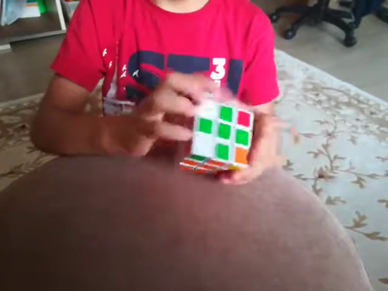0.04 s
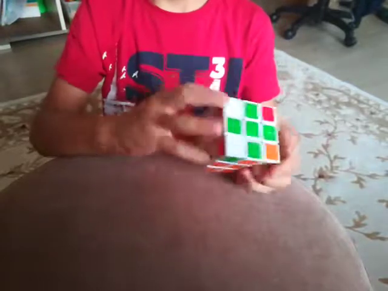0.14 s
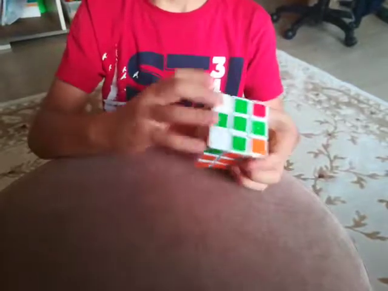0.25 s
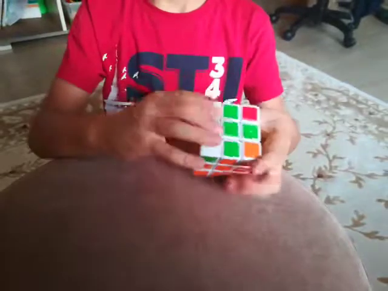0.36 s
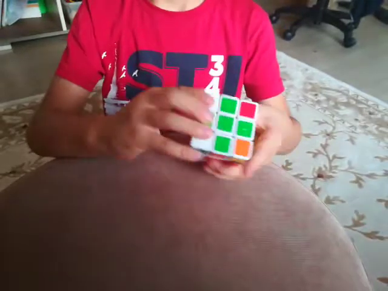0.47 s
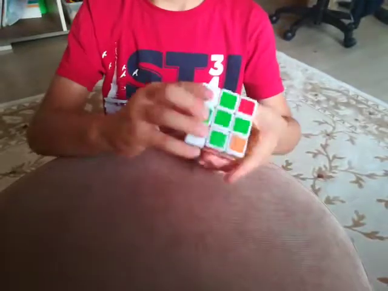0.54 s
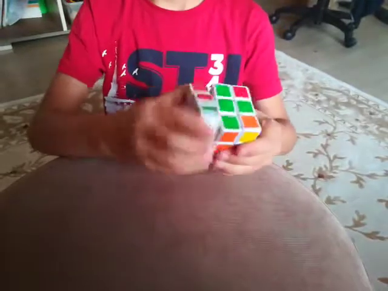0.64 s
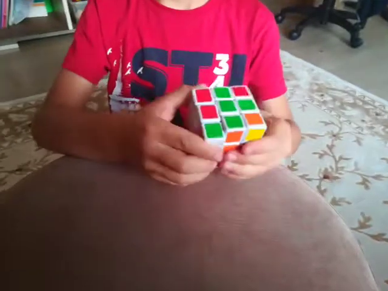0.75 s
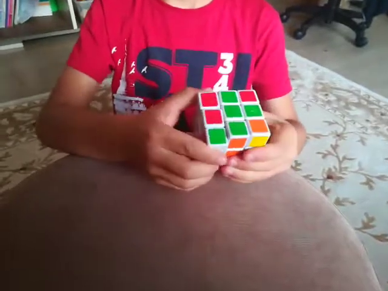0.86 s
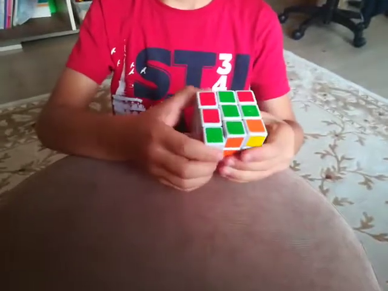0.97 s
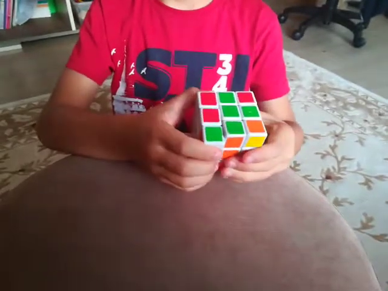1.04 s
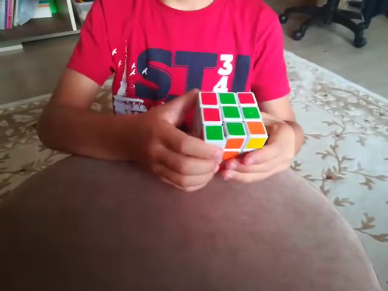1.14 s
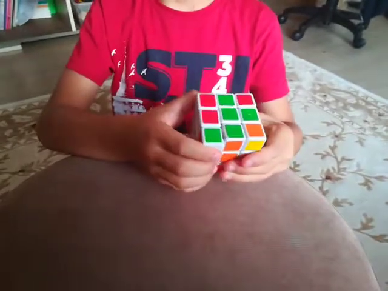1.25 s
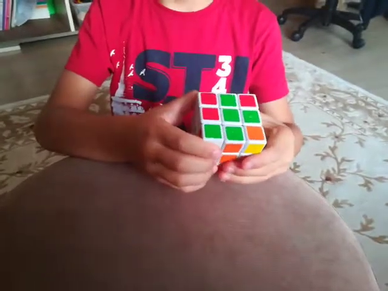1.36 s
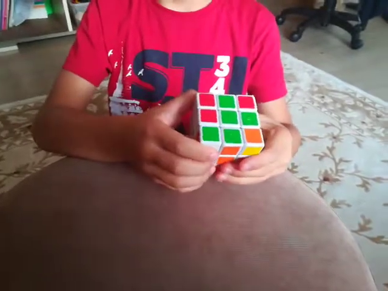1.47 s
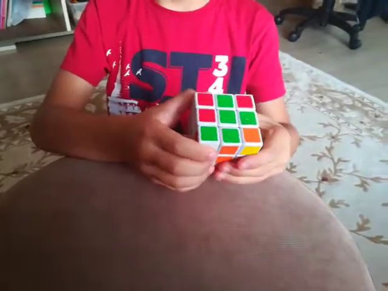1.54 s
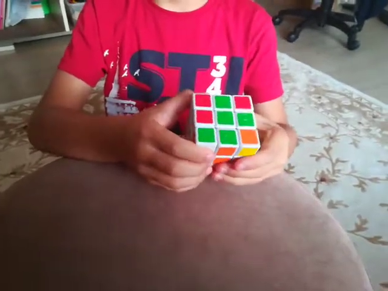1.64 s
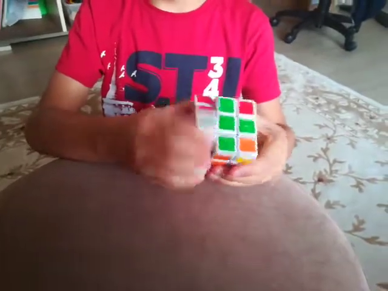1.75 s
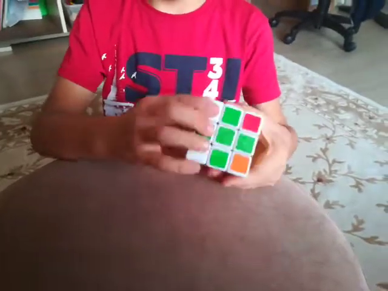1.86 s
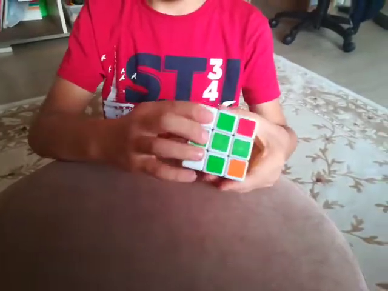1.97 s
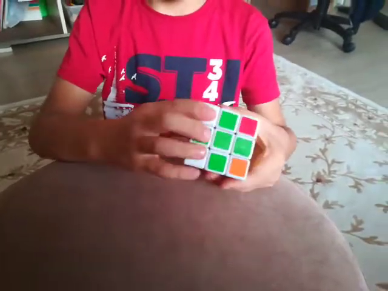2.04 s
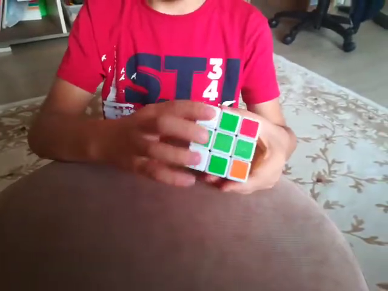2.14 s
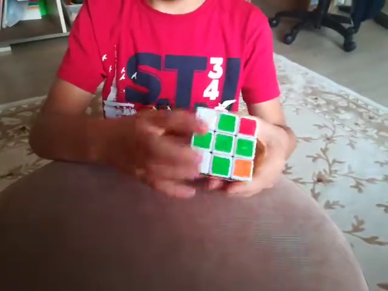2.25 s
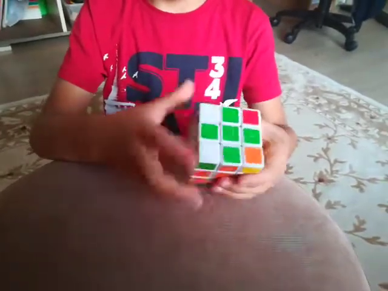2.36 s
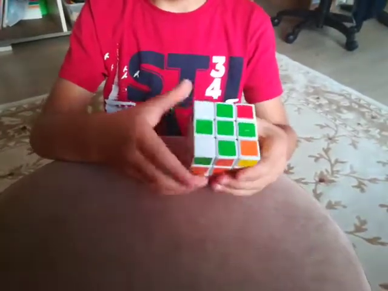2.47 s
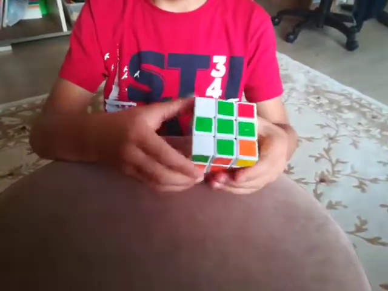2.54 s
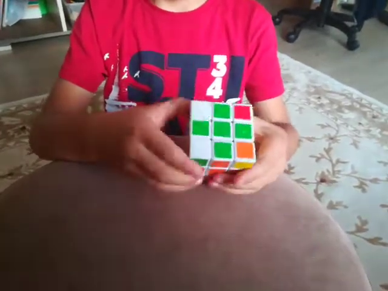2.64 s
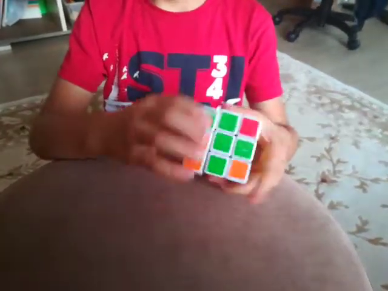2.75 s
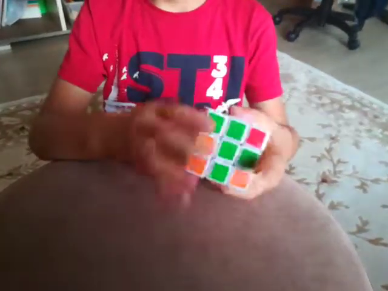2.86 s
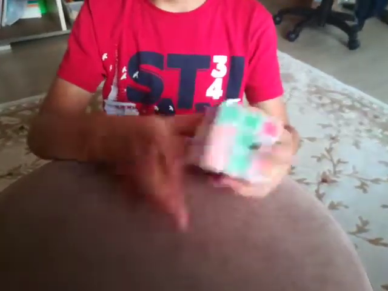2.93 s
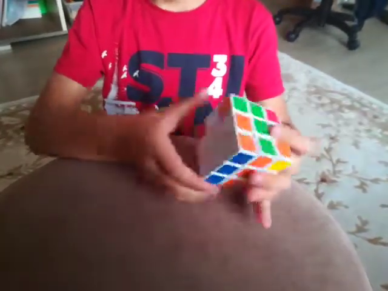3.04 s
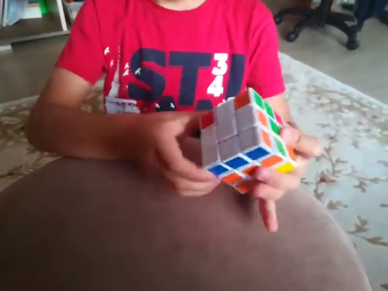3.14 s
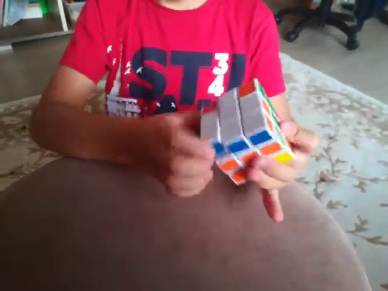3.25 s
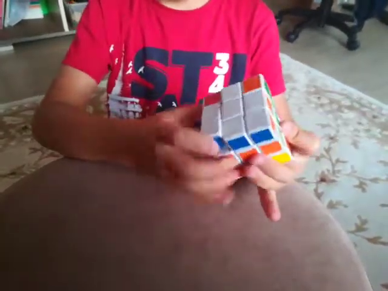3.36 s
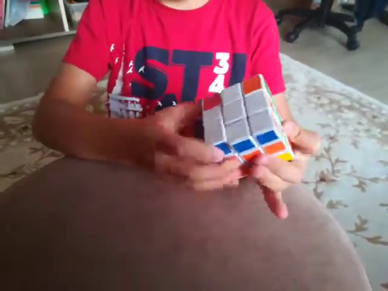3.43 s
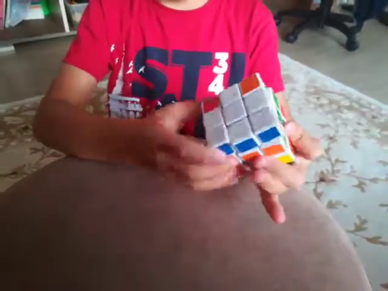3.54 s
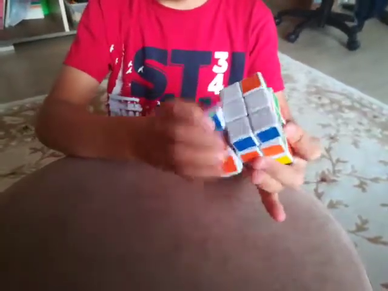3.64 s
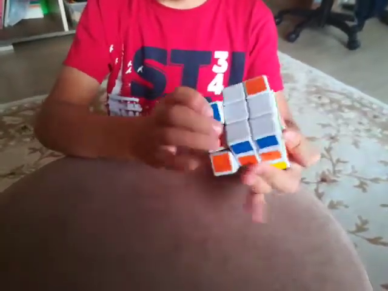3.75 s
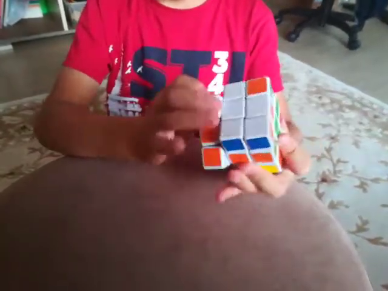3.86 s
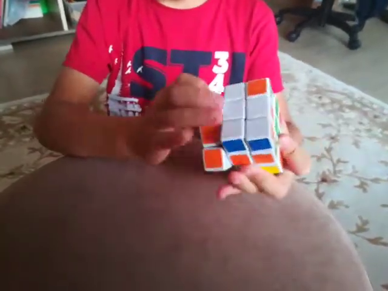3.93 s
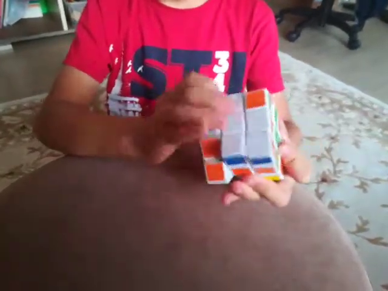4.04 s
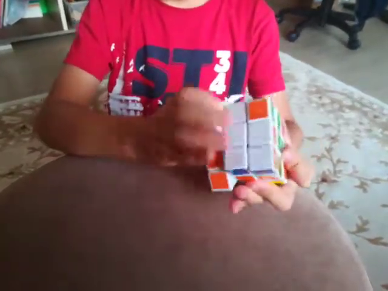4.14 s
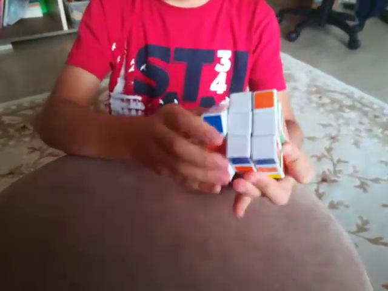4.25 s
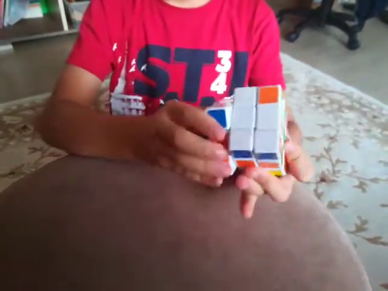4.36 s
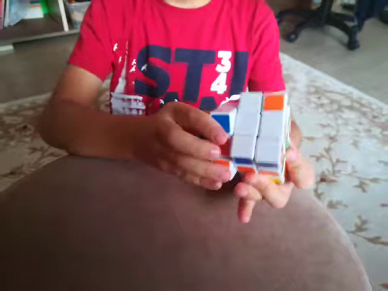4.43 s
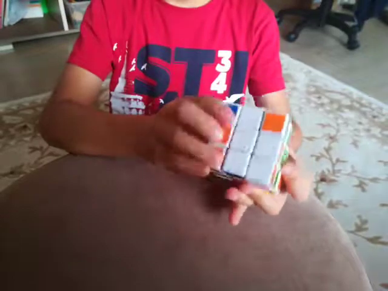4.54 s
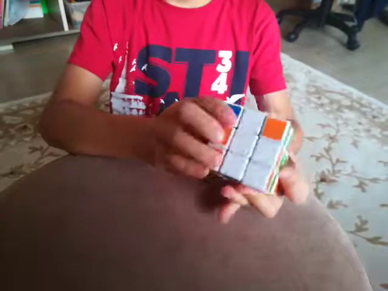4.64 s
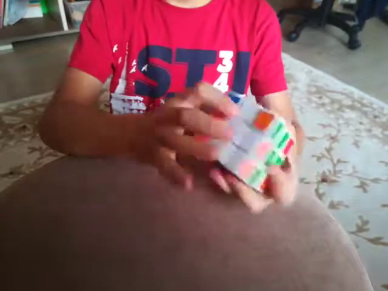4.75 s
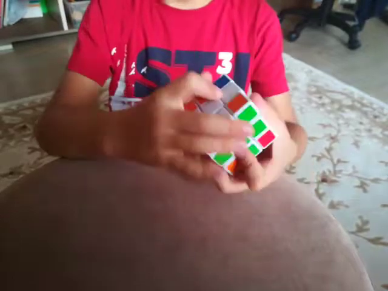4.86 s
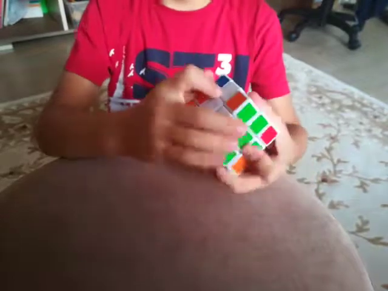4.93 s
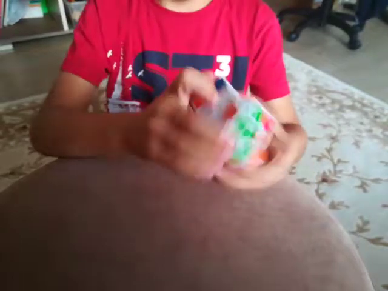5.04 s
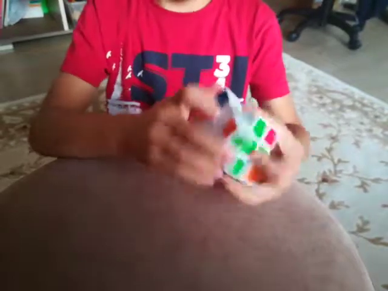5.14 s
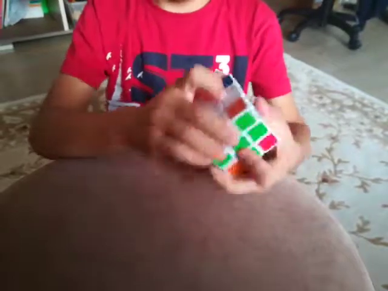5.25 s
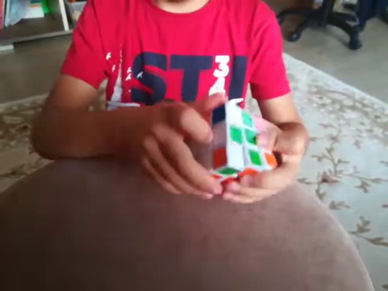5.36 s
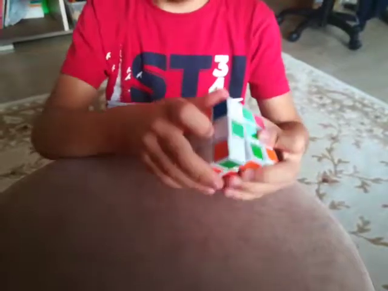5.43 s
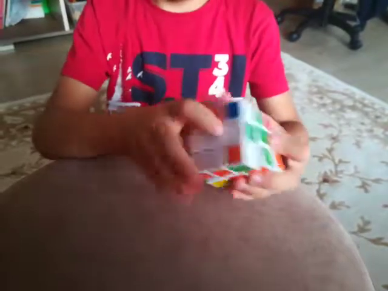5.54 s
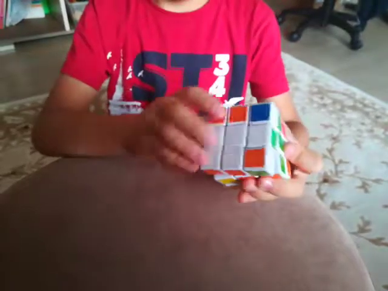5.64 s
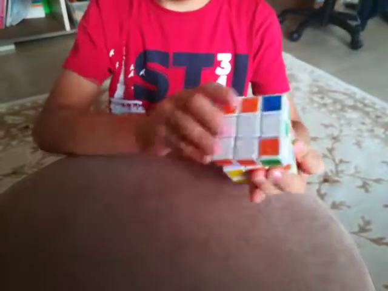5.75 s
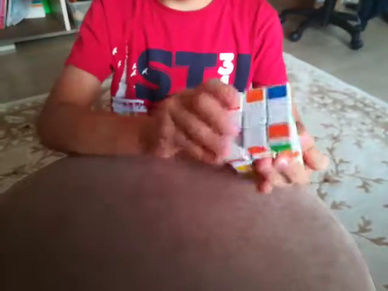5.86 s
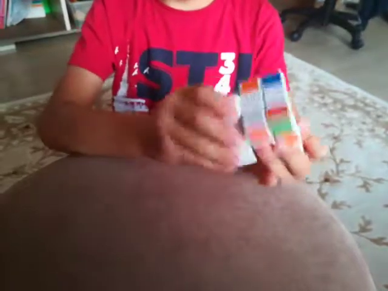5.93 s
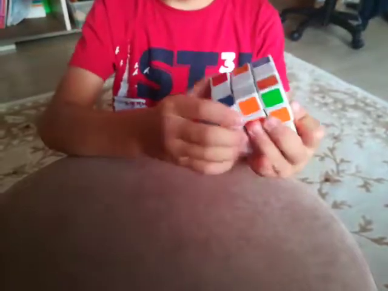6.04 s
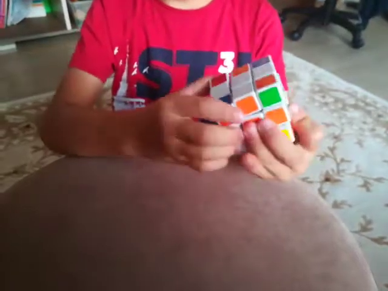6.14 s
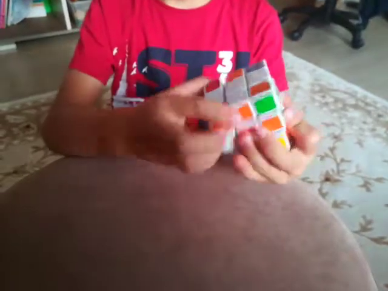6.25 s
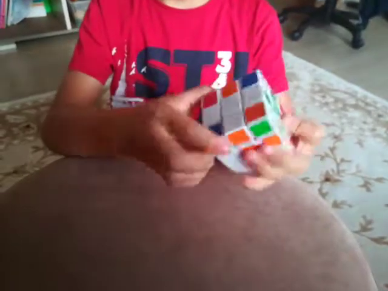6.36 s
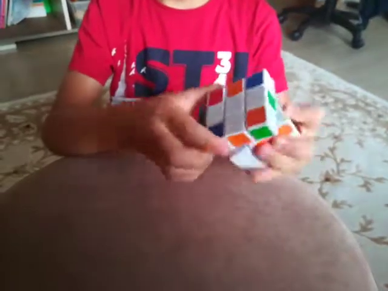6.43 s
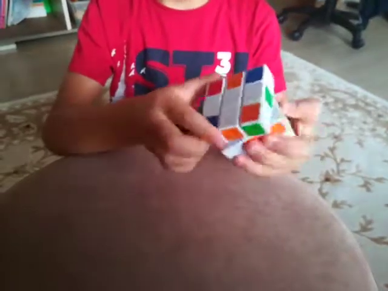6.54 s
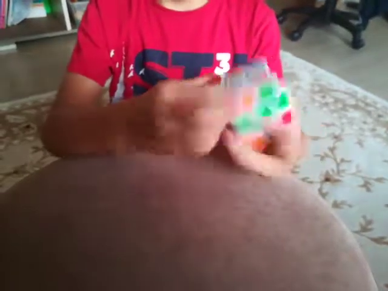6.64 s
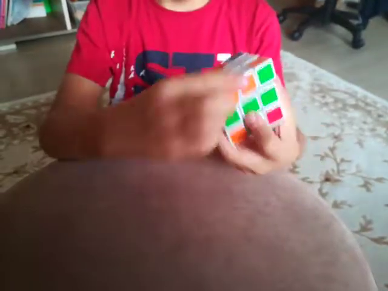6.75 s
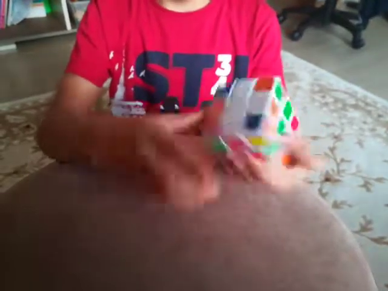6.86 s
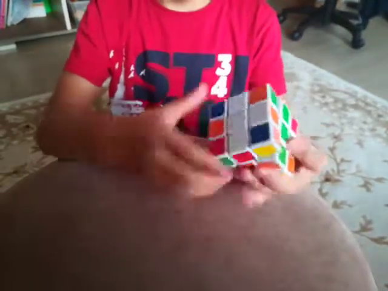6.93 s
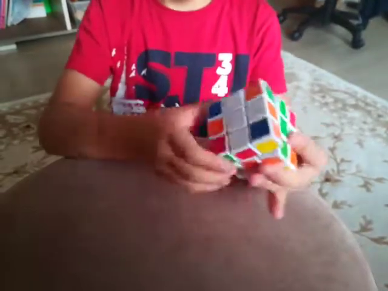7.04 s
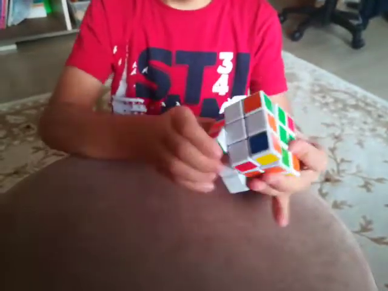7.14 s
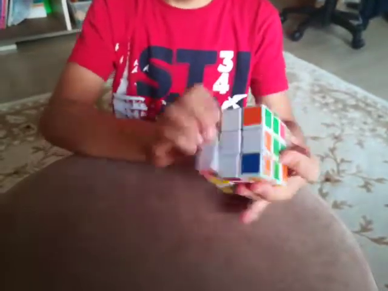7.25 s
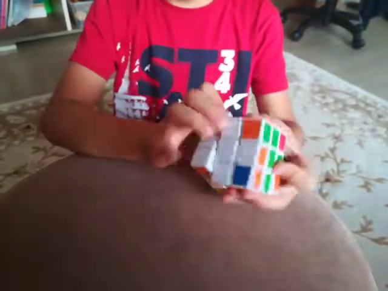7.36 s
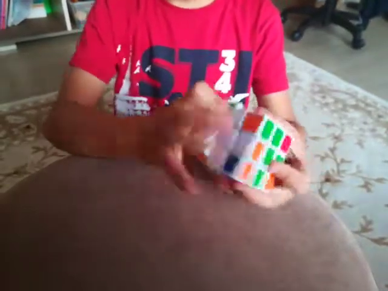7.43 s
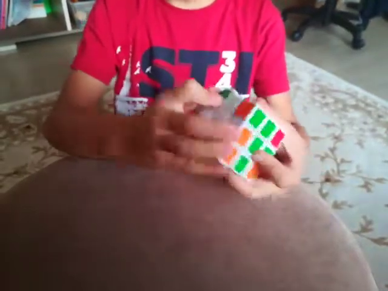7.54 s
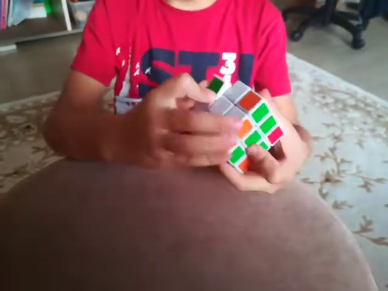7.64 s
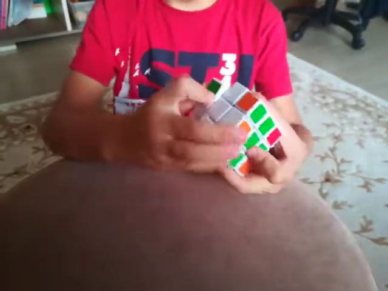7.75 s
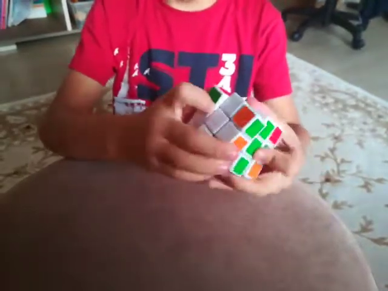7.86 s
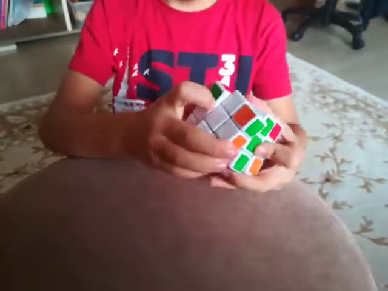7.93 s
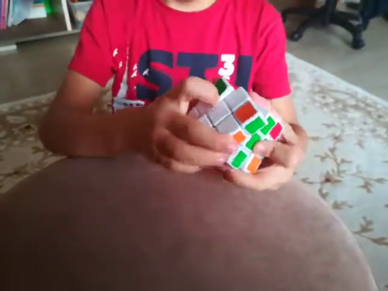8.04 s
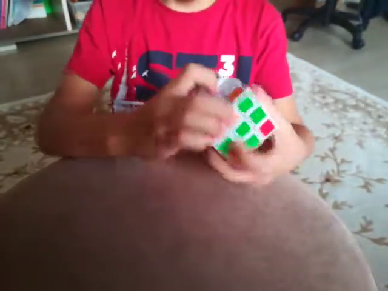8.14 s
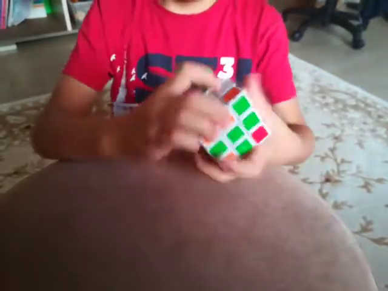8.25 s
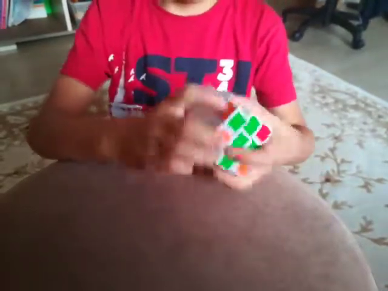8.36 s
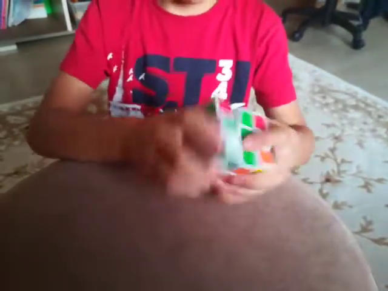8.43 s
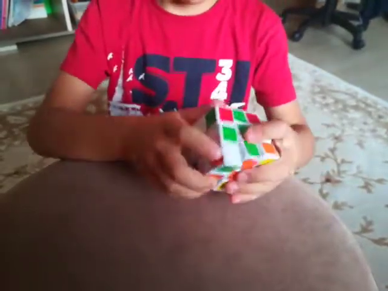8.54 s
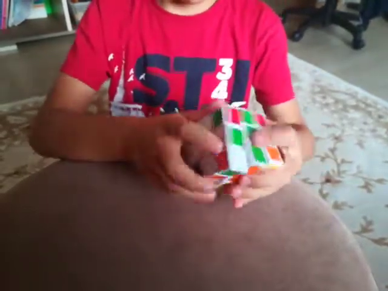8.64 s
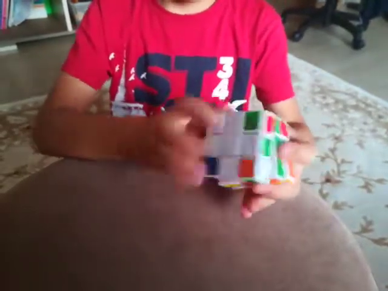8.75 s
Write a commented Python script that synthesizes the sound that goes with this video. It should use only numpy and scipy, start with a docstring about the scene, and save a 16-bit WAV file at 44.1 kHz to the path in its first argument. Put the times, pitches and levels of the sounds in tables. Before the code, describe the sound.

A plastic puzzle cube is turned by hand up close, a few separate crunchy clicks giving way to near-continuous rattling and rasping turns.

```python
"""A plastic puzzle cube is turned quickly by hand close to a phone in a quiet living room.
Its hollow pieces tick (noise bursts rung through a plastic shell and an air space), a sliding layer
rasps (dense random ticks), and now and then a layer slams into line (a few ms of noise).
Fingers bump, squeak and slide (filtered noise), a spring rings once (fading sine tones),
and the room adds a short echo tail and a low murmur (shaped noise)."""
import sys
import numpy as np
from scipy import signal
from scipy.fft import rfft, irfft
from scipy.io import wavfile
from scipy.ndimage import uniform_filter1d

SR = 44100
rng = np.random.default_rng(int(sys.argv[2]) if len(sys.argv) > 2 else 0)


def materialize(psi):
    """Save the field psi as 16-bit PCM at rate SR to the path in sys.argv[1].

    A 1-D psi becomes a single channel; in a 2-D psi each row is a channel.
    """
    bounded = np.clip(np.atleast_2d(psi).T, -1, 1)
    quanta = np.round(bounded * 32767).astype(np.int16)
    wavfile.write(sys.argv[1], SR, quanta)


N = 387638  # length in samples, about 8.79 s


def undb(db):
    """Turn decibels into a plain gain."""
    return 10 ** (np.asarray(db) / 20)


def curve(rows):
    """Join rows (t/s, value) with straight lines, giving one value per sample."""
    return np.interp(np.arange(N) / SR, *np.transpose(rows))


def random_curve(step_s):
    """Wander between random values, with a new one every step."""
    steps = np.arange(0, N / SR, step_s)
    return curve(np.c_[steps, rng.standard_normal(len(steps))])


def shape(points, hz):
    """Read a spectrum of rows (f/Hz, level/dB) at the given frequencies."""
    f, db = np.transpose(points)
    return np.interp(np.log(np.maximum(hz, 1)), np.log(f), db)


def ring(db):
    """Make the sound of one tap on a body with this spectrum, with nothing before the tap."""
    cepstrum = irfft(db * np.log(10) / 20)
    half = cepstrum.shape[-1] // 2
    # folding the second half onto the first puts the energy as early as possible
    cepstrum[..., 1:half] *= 2
    cepstrum[..., half + 1:] = 0
    return irfft(np.exp(rfft(cepstrum)))


def colour(x, points, size=1024):
    """Pass a sound through a response of rows (f/Hz, level/dB)."""
    response = ring(shape(points, np.fft.rfftfreq(size, 1 / SR)))
    return signal.fftconvolve(x, response)[:len(x)]


def unit(x):
    """Scale to an energy of one along the last axis."""
    return x / np.sqrt(np.sum(x ** 2, axis=-1, keepdims=True) + 1e-18)


def add(track, s, sound):
    """Mix a sound into a track at a time in seconds."""
    i = max(int(s * SR), 0)
    part = sound[..., :max(N - i, 0)]
    track[..., i:i + part.shape[-1]] += part


def uneven(count, db, size, order):
    """Smooth random hills in a spectrum: no two pieces ring alike, nor alike in two directions."""
    hills = rng.standard_normal((count, size // 2 + 1))
    hills = uniform_filter1d(uniform_filter1d(hills, order), order)
    return db * np.tanh(hills / hills.std())


def sound_of(force, spectrum_db):
    """Ring the force of each contact, one per row, through its body."""
    return irfft(rfft(force) * rfft(ring(spectrum_db)))


# spectrum of the still room's murmur: f/Hz, relative level/dB
MURMUR_SPECTRUM = [(20, 2.5), (45, 0), (90, -4), (160, -13), (300, -15), (500, -23.5), (1000, -18),
                   (1750, -18.5), (2500, -28), (5000, -30), (13800, -35.5), (15000, -54)]
# how the murmur's overall level changes: t/s, level/dB
MURMUR_LEVEL = [(0, -62), (1.4, -62.5), (2.4, -65), (4.3, -66), (5.4, -69.5), (8.79, -67.5)]


def air(wide_hz=280, hiss_db=-82, swell_db=2):
    """The house murmurs, its bass swelling unevenly and alike on both sides, under steady microphone hiss."""
    f = np.fft.rfftfreq(N, 1 / SR)
    mid, side = rfft(rng.standard_normal((2, N))) * undb(shape(MURMUR_SPECTRUM, f))
    bass = mid * (f < 130)
    swelling_bass = irfft(bass, N) * undb(swell_db * random_curve(.1))
    mid = mid - bass + rfft(swelling_bass)
    side = side * f / np.hypot(f, wide_hz)  # little left-right difference in the bass
    murmur = irfft(np.array([mid + side, mid - side]), N)
    murmur = murmur / murmur.std() * undb(curve(MURMUR_LEVEL))
    hiss = undb(hiss_db) * rng.standard_normal((2, N))
    return murmur + hiss


# fingers push a layer round, from a light nudge to a full turn:
# start t/s, length/s, rasp level/dB reached at the end of the push (before rub_db in rasp)
TURNS = [(0, 0.035, -52.5), (0.155, 0.023, -77), (0.254, 0.13, -63), (0.427, 0.067, -43.5),
         (0.502, 0.083, -33.5), (0.585, 0.092, -47.5), (0.874, .17, -56), (1.193, 0.06, -59.5),
         (1.633, 0.083, -35), (1.735, 0.031, -43), (2.111, 0.077, -57), (2.581, 0.09, -30.5),
         (2.835, 0.042, -45), (3.056, 0.043, -38), (3.277, 0.046, -46), (3.37, 0.053, -49.5),
         (3.513, 0.097, -31), (3.621, 0.072, -45), (3.757, 0.069, -42), (3.971, 0.12, -50),
         (4.381, 0.089, -37.5), (4.571, 0.093, -62.5), (4.759, 0.098, -48), (4.879, .035, -31),
         (4.951, 0.035, -32), (5.039, 0.047, -37.5), (5.183, 0.1, -41), (5.667, 0.11, -59.5),
         (5.765, 0.15, -36), (5.959, .11, -50.5), (6.172, 0.15, -42), (6.459, 0.039, -46.5),
         (6.5, 0.081, -29.5), (6.668, 0.049, -55.5), (6.92, 0.081, -49.5), (7.012, 0.062, -36),
         (7.106, .075, -33), (7.285, 0.022, -56), (7.366, 0.098, -53.5), (7.46, 0.073, -46),
         (7.619, 0.073, -51.5), (7.694, 0.043, -41), (7.768, 0.13, -39.5), (7.943, 0.12, -39),
         (8.16, 0.1, -45), (8.302, 0.076, -32.5), (8.437, 0.093, -55.5), (8.696, 0.058, -71)]


def push(attack_s=.004, swell_db=6.5, release_s=.008, creep_db=-10, creep_s=.049):
    """Each push takes hold, bears down harder, lets go, and the loosened layer creeps faintly on."""
    age, out = np.arange(SR) / SR, np.zeros(N)
    for s, length, db in TURNS:
        swell = undb(db + swell_db * (np.minimum(age / length, 1) - 1.0))
        attack = np.minimum(age / attack_s, 1)
        after = np.maximum(age - length, 0)
        creep = undb(creep_db) * np.exp(-after / creep_s)
        release = np.maximum(np.exp(-after / release_s), creep)
        add(out, s, swell * attack * release)
    return out


# ring of a small plastic piece: f/Hz, relative level/dB
SHELL = [(100, -36), (500, -45.5), (1000, -44.5), (1700, -25), (2500, -14), (3200, -5), (4500, -2.5),
         (5200, -2.5), (6900, 4), (8200, -2), (9300, -13), (11000, -34.5), (13200, -29), (15000, -37.5)]
# ring of the cube's air space and core: f/Hz, relative level/dB
HOLLOW = [(200, -15), (500, -16), (900, 0.5), (1500, 17.5), (2200, 21), (3000, 9.5), (6000, -31)]


def rasp(rate=1900, spread_db=4.0, catch_db=6, rub_db=-2.07, knock_db=-14, count=8, size=512):
    """Sliding faces stick and slip: dense uneven ticks, from one piece after another as each catches."""
    catch_s, even_s = .006, .04
    catching = np.array([random_curve(catch_s) for _ in range(count)])
    strength = undb(spread_db * np.minimum(rng.exponential(size=(count, N)), 3))
    happens = rng.random((count, N)) < rate / count / SR  # rate: slips per second, all pieces together
    slips = happens * strength * rng.choice([-1, 1], (count, N))
    rubbing = 0.044 * rng.standard_normal((count, N))
    slips = (slips + rubbing) * undb(catch_db * catching)
    # the fingers' push sets the power, however it is split into slips
    power = uniform_filter1d(np.sum(slips ** 2, axis=0), int(even_s * SR))
    slips *= push() * undb(rub_db) / np.sqrt(power)
    f = np.fft.rfftfreq(size, 1 / SR)
    tracks = []
    for body in (SHELL, SHELL, HOLLOW):  # tick left, tick right, knock
        rings = unit(ring(shape(body, f) + uneven(count, 7, size, order=7)))
        tracks.append(signal.oaconvolve(slips, rings, axes=1)[:, :N].sum(axis=0))
    left, right, knock = tracks
    return np.array([left, right, undb(knock_db) * knock])


def room(x, wet_db, t60, gap_s=.004):
    """Direct sound plus a tail that starts with sparse reflections from the table and the player."""
    t = np.arange(int(.6 * SR)) / SR
    density = np.clip(t / .04, .02, 1) ** 2  # echoes crowd together over 40 ms
    echoes = rng.standard_normal(len(t)) * (rng.random(len(t)) < density) / np.sqrt(density)
    fade = np.exp(-np.log(1000) * t / t60)  # down 60 dB after t60 seconds
    tail = unit(echoes * (t > gap_s) * fade)
    return x + undb(wet_db) * signal.fftconvolve(x, tail)[:N]


# the right microphone faces away, so its treble is dull, and its port resonates: f/Hz, level/dB
SHADE = [(1000, -1), (1300, -4), (1550, 7.5), (1800, 15), (2150, 2.5), (2850, -11.5), (3700, -9),
         (5400, -17), (7000, -26), (8200, -27.5), (10000, -15.5), (11500, -3.5), (13500, -9.5)]


def right_microphone(x, lag_s=.00012):
    """Sound reaches this microphone a little later, coloured by its angle and its port."""
    shaded = rfft(colour(x, SHADE))
    return irfft(shaded * np.exp(-2j * np.pi * np.fft.rfftfreq(N, 1 / SR) * lag_s), N)


def rattles(firm_db=-40, rattle_db=-34.5, follow=0.62, scatter_db=2.5, centre_hz=6450, scatter_hz=450,
            hollow_db=-18, hollow_scatter_db=4, count=6):
    """Every turn jostles a few loose pieces along its way, louder under a firmer push; rows as in SNAPS."""
    start, length, db = np.transpose(TURNS)[:, :, None]
    s = start + length * (np.arange(count) + rng.random((len(TURNS), count))) / count
    loud, hard, hollow = rng.standard_normal((3, len(TURNS), count))
    level = rattle_db + follow * (db - firm_db) + scatter_db * loud
    tick_hz = centre_hz + scatter_hz * hard
    knock = hollow_db + hollow_scatter_db * hollow
    return np.column_stack([column.ravel() for column in (s, level, tick_hz, knock)])


# pieces snapping past each other: t/s, level/dB (rms over a click, before piece_db),
# f/Hz steering how bright the tick is, hollow knock's relative level/dB (before knock_db)
SNAPS = [(0.0292, -45, 6120, -35), (0.0897, -42, 7600, -12), (.256, -45.5, 6400, -22),
         (.282, -34.5, 6800, -43), (0.3767, -38, 6600, -25), (0.4424, -34, 6700, -38),
         (.454, -29.5, 6800, -33), (0.4753, -26, 6000, -5.5), (0.4854, -26.5, 5500, -34),
         (0.512, -14.5, 7360, -10.5), (0.5523, -17.5, 7150, -22), (.5668, -21.5, 7060, -27),
         (.624, -20, 7500, -35), (0.6299, -22, 7000, -30), (0.6344, -20.5, 5860, -10.5),
         (0.711, -33.5, 6200, -27), (0.8757, -45, 7200, -20), (0.8834, -35, 7850, -22),
         (0.9276, -36.5, 7300, -20), (.951, -40.5, 6400, -31), (1.0299, -34, 6830, -22),
         (1.224, -41, 6130, -25), (1.269, -28.5, 7350, -21.5), (1.491, -38.5, 6450, -24),
         (1.5205, -32.5, 6100, -18), (1.6061, -29.5, 6400, -22), (1.6322, -22, 6660, -22),
         (1.6538, -21.5, 6200, -9.5), (1.678, -16, 5600, -5), (1.6942, -7.5, 6600, -25),
         (1.708, -27, 6200, -1.5), (1.7435, -24, 6160, -11.5), (1.7904, -30, 6200, -25),
         (2.1185, -25.5, 6500, -21.5), (2.1747, -26.5, 6280, -16), (2.5632, -39.5, 6410, -17),
         (2.589, -27, 6900, -21), (2.6, -19.5, 7200, -7), (2.6412, -15, 5500, -8.5),
         (2.7327, -28.5, 6400, -34), (2.827, -41, 5200, -17), (2.8415, -18.5, 7350, -14.5),
         (2.9653, -31, 6380, -13), (3.0038, -19.5, 6700, -22), (3.0605, -28.5, 7360, -17.5),
         (3.0876, -20.5, 5200, -10), (3.0974, -25, 6400, -13.5), (3.181, -35.5, 4800, -35),
         (3.2196, -29.5, 6000, -20), (3.2609, -22, 6000, -23), (3.282, -25.5, 6450, -27),
         (3.3007, -26, 6400, -35), (3.337, -31, 7140, -32), (3.3618, -32, 6050, -18),
         (3.442, -33, 5370, -17), (3.472, -22.5, 6840, -21.5), (3.51, -26, 6800, -23),
         (3.5644, -21.5, 7040, -29), (3.5795, -15.5, 6760, -26), (3.6012, -14, 6750, -25),
         (3.6378, -16.5, 6450, -15), (3.6783, -13.5, 6240, -37), (3.7543, -23, 6100, -48),
         (3.7776, -22.5, 5960, -35), (3.844, -35.5, 5100, -26), (3.8735, -25, 5400, -20),
         (3.8912, -16, 6750, -20), (3.905, -3, 5850, -17), (3.9162, -23, 6100, -21),
         (3.9772, -15.5, 7750, -29), (4.0186, -29.5, 7350, -20), (4.0379, -29, 6400, -16),
         (4.049, -32, 5870, -17), (4.0634, -28, 6200, -19), (4.1562, -29.5, 7700, -26),
         (4.1714, -21.5, 7300, -26), (4.1878, -26, 6800, -23), (4.2687, -44, 6800, -24),
         (4.3776, -33.5, 6840, -39), (4.3954, -20.5, 6440, -24.5), (4.411, -23, 6000, -12),
         (4.4242, -26.5, 6750, -28), (4.4301, -24, 5960, -7), (4.5718, -35.5, 6200, -25),
         (4.6235, -29, 6450, -16), (4.638, -28.5, 6620, -18), (4.6664, -28.5, 6640, -16.5),
         (4.7757, -27.5, 6850, -24), (4.7857, -30, 7040, -27), (4.823, -22.5, 7100, -24),
         (4.833, -27, 6600, -25), (4.846, -19, 5600, -13), (4.886, -29.5, 6000, -7),
         (4.9443, -33.5, 4700, -27), (4.9576, -7, 6200, -18), (4.9631, -10.5, 5300, -8),
         (4.976, -10, 6450, -13), (5.0542, -33, 6300, -26), (5.0723, -20, 5670, -11),
         (5.1716, -26, 6400, -21), (5.1817, -32.5, 6300, -5.5), (5.2079, -28, 5200, -16),
         (5.223, -20, 6100, -9.5), (5.2425, -16, 6230, -9.5), (5.255, -25, 6700, -3.5),
         (5.2932, -31, 5360, -1.5), (5.3844, -41.5, 6270, -14), (5.4911, -27, 6300, -18.5),
         (5.5826, -33.5, 6200, -34), (5.6218, -32.5, 6560, -22.5), (5.6974, -41.5, 5970, -27),
         (5.712, -41.5, 6160, -28), (5.759, -33.5, 6600, -42), (5.7814, -20, 5700, -7.5),
         (5.823, -22.5, 7500, -39), (5.8568, -23, 7500, -14), (5.8653, -24.5, 6000, -8),
         (5.8848, -25.5, 7400, -8), (5.9253, -29.5, 6550, -17), (5.9613, -28, 6300, -21),
         (6.07, -27, 6100, -15.5), (6.112, -27, 5740, -49), (6.1606, -29, 4700, -40),
         (6.1797, -33, 5050, -33), (6.199, -33.5, 6230, -17), (6.2219, -28, 6500, -17),
         (6.4317, -38, 6500, -20), (6.4579, -27.5, 6770, -17), (6.4748, -32.5, 7350, -32),
         (6.5132, -17, 5020, -14.5), (6.555, -17, 5560, -9.5), (6.6164, -22.5, 5500, -4.5),
         (6.6893, -31.5, 7030, -10.5), (6.7643, -37.5, 6200, -13), (6.8705, -32, 7000, -34),
         (6.9237, -30, 7100, -21.5), (6.9335, -25, 7100, -23), (7.0255, -28, 5860, -9),
         (7.0451, -20.5, 7500, -19), (7.05, -22, 6550, -18), (7.1174, -19.5, 6750, -13),
         (7.1259, -18, 5650, -12.5), (7.1402, -23, 6500, -13), (7.1587, -20, 4850, -12),
         (7.2705, -33.5, 6600, -13.5), (7.3667, -45, 6300, -17), (7.397, -36.5, 6260, -18),
         (7.4425, -33.5, 6460, -36), (7.4753, -27.5, 6700, -26), (7.5175, -31.5, 6300, -9.5),
         (7.6222, -42, 6100, -12), (7.638, -34.5, 6000, -21), (7.6678, -29.5, 7400, -21.5),
         (7.7793, -26, 6700, -20.5), (7.789, -28.5, 7300, -24), (7.8726, -25.5, 6650, -24),
         (7.9403, -25, 6700, -25), (7.9494, -27.5, 5700, -35), (8.0674, -27, 4840, -6),
         (8.08, -14.5, 6030, -14.5), (8.1645, -23.5, 6660, -17.5), (8.1788, -33.5, 7160, -12),
         (8.264, -26, 5940, -6.5), (8.3252, -22, 6750, -3.5), (8.4951, -34.5, 7000, -17),
         (8.5426, -41.5, 6230, -17), (8.712, -41.5, 6350, -29)]


def clicks(lead_s=.003, scrape_s=0.00098, settle_s=0.0012, snap=1.1, tilt_db=32, edge_db=2.5, force_db=2.5,
           shift_octaves=.08, piece_db=1, knock_db=-4, shell_hz=5855, click_s=.0016, size=1024):
    """An edge scrapes, snaps home and settles in tiny contacts; gives tick left, tick right, knock."""
    s, db, hz, hollow_db = np.vstack([SNAPS, rattles()]).T
    count = len(s)
    t = (np.arange(size) - int(lead_s * SR)) / SR
    grit = rng.standard_normal((count, size)) * np.abs(rng.standard_normal((count, size)))
    force = .2 * grit * np.exp(-np.abs(t) / np.where(t < 0, scrape_s, settle_s))
    force[:, int(lead_s * SR)] += snap * rng.random(count)  # some snap cleanly, others only crunch
    f = np.fft.rfftfreq(size, 1 / SR)
    # a harder contact tilts the ring towards the treble
    hardness = np.log2(hz[:, None] / shell_hz)
    shell = shape(SHELL, f) + tilt_db * hardness * np.log2(np.clip(f, 2500, 8000) / shell_hz)
    # sharp edges and firm snaps add a crisp top
    firmness = (db - db.mean()) / db.std()
    crisp_db = edge_db * (1 + rng.standard_normal(count)) + force_db * firmness
    shell = shell + crisp_db[:, None] * np.interp(f, [9000, 11000], [0, 1])
    left, right = (unit(sound_of(force, shell + uneven(count, 6, size, order=22))) for _ in range(2))
    # the air space changes as the layers move, drawn at random for each click
    opening = 2 ** (shift_octaves * rng.standard_normal((count, 1)))
    hollow = shape(HOLLOW, f * opening) + uneven(count, 5, size, order=6)
    knock = unit(sound_of(force, hollow)) * undb(knock_db + hollow_db)[:, None]
    strength = undb(db + piece_db) * np.sqrt(click_s * SR)
    out = np.zeros((3, N))
    for k in range(count):
        add(out, s[k] - lead_s, strength[k] * np.array([left[k], right[k], knock[k]]))
    return out


# a layer slams into line and all its pieces chatter:
# t/s, length/s, rms level/dB, hollow knock's relative level/dB (before knock_db)
SLAMS = [(0.51, 0.011, -23.5, -5.5), (3.9017, 0.0076, -9.5, -12.5), (4.957, 0.0039, -18, -6),
         (5.244, 0.0066, -32, -12)]


def slams(knock_db=-4, size=1024):
    """Many contacts crowd into a few milliseconds of noise, heard through shell and air space."""
    out = np.zeros((3, N))
    for s, length, db, hollow_db in SLAMS:
        force = rng.standard_normal(size) * np.exp(-(np.arange(size) / SR / length) ** 4)
        tick = unit(colour(force, SHELL))
        knock = undb(hollow_db + knock_db) * unit(colour(force, HOLLOW))
        add(out, s, undb(db) * np.sqrt(length * SR) * np.array([tick, tick, knock]))
    return out


# fingers bump, squeak and slide on the cube:
# t/s at the peak, length/s, f/Hz, width/Hz, rms level/dB, left minus right level/dB
GRIPS = [(0.674, 0.015, 122, 117, -55, 3), (4.187, 0.05, 227, 45, -71, -4.5),
         (4.222, 0.018, 1540, 170, -55, -8.5), (8.618, 0.074, 4250, 420, -73, -8)]


def grips():
    """Skin on plastic: short soft swells of friction in one resonance."""
    out, f = np.zeros((2, N)), np.fft.rfftfreq(SR // 2, 1 / SR)
    t = (np.arange(SR // 2) - SR // 4) / SR
    for s, length, hz, width_hz, db, pan_db in GRIPS:
        resonance = 1 / (1 + ((f - hz) / width_hz) ** 2) ** 2
        friction = irfft(rfft(rng.standard_normal(len(t))) * resonance, len(t))
        swell = unit(friction * np.exp(-.5 * (t / length) ** 2)) * np.sqrt(length * SR)
        side_db = db + np.array([[pan_db], [-pan_db]]) / 2
        add(out, s + t[0], swell * undb(side_db))
    return out


# tones of a spring in the core: f/Hz, level/dB relative to twang_db, time to fade by 60 dB/s
SPRING = [(1800, -3.5, 0.68), (3870, 8.5, 0.89), (4960, 2, 0.69), (5400, 7.5, 1)]


def spring(twang_s=2.583, twang_db=-54.5):
    """Twanged by one hard turn, thin steel rings on in a few fading tones that outlast the turn."""
    t, out = np.arange(SR) / SR, np.zeros(N)
    for hz, db, t60 in SPRING:
        fade = np.exp(-np.log(1000) * t / t60)
        add(out, twang_s, undb(twang_db + db) * np.sin(2 * np.pi * hz * t) * fade)
    return out


def scene(t60=0.27):
    """The cube is held near the left microphone; the right one hears it later, with more of the room."""
    tick_left, tick_right, knock = rasp() + clicks() + slams()
    knock = knock + spring()
    left = room(tick_left + knock, wet_db=-13.5, t60=t60)
    right = right_microphone(room(tick_right + knock, wet_db=-9.5, t60=t60))
    return np.array([left, right]) + grips() + air()


def record(dry, overload_hz=520, top_hz=14500):
    """The hardest snaps overload the phone with a crackle that has little bass; the top is cut."""
    excess = np.clip(dry, -1, 1) - dry
    less_bass = signal.butter(1, overload_hz, "high", fs=SR, output="sos")
    crackle = signal.sosfiltfilt(less_bass, excess)
    top_cut = signal.ellip(6, .1, 50, top_hz, fs=SR, output="sos")
    return signal.sosfiltfilt(top_cut, dry + crackle)


dry = scene()
out = record(dry)
materialize(out)
```